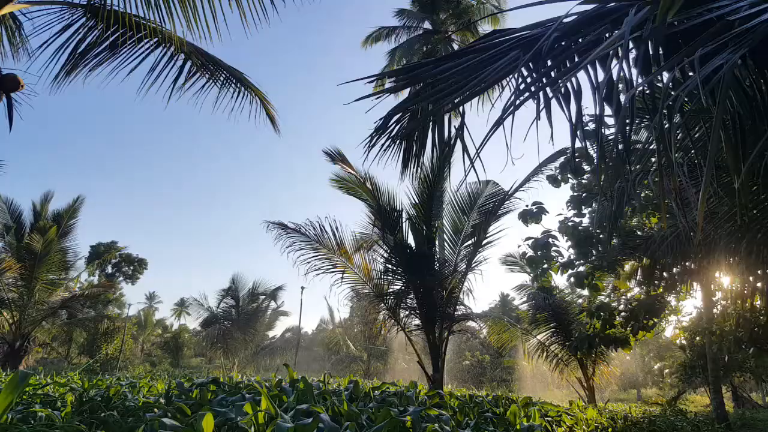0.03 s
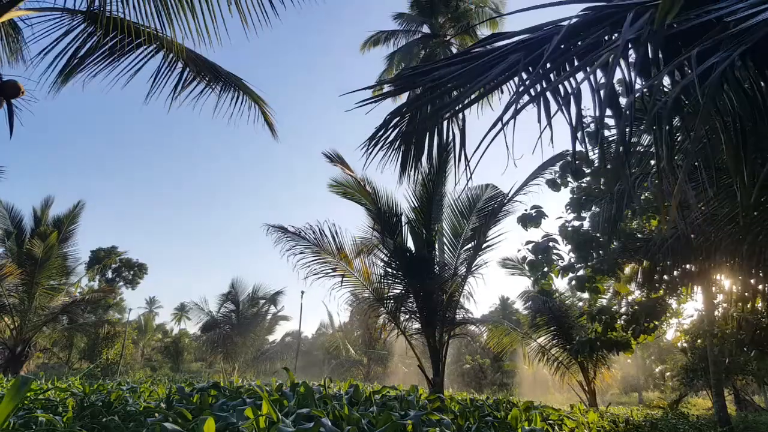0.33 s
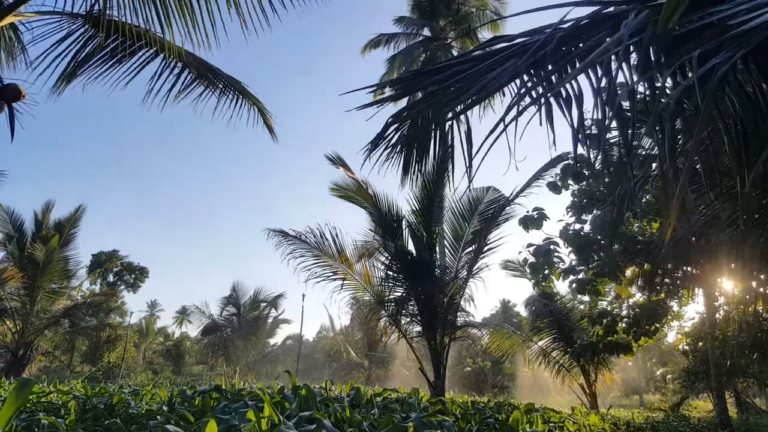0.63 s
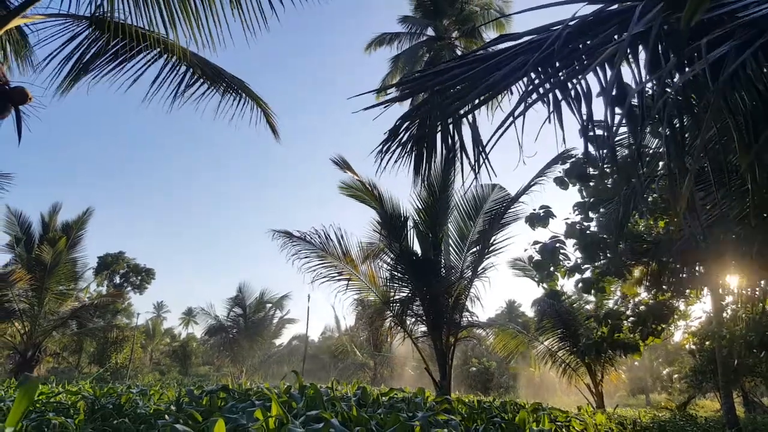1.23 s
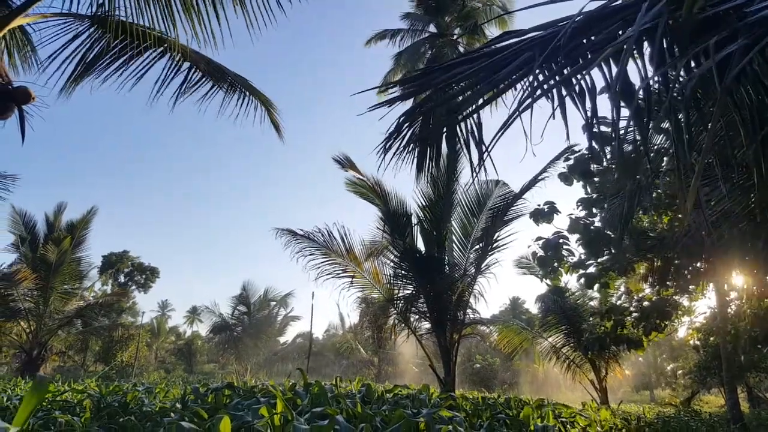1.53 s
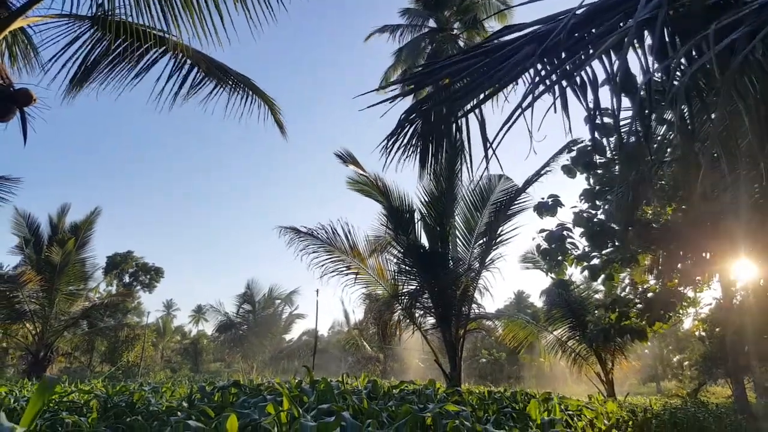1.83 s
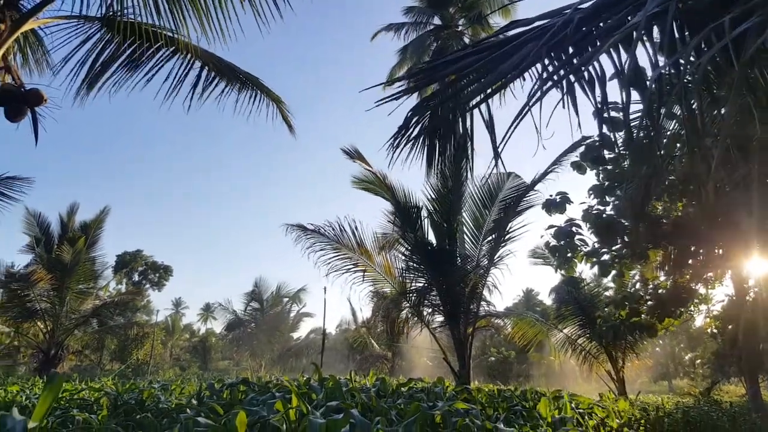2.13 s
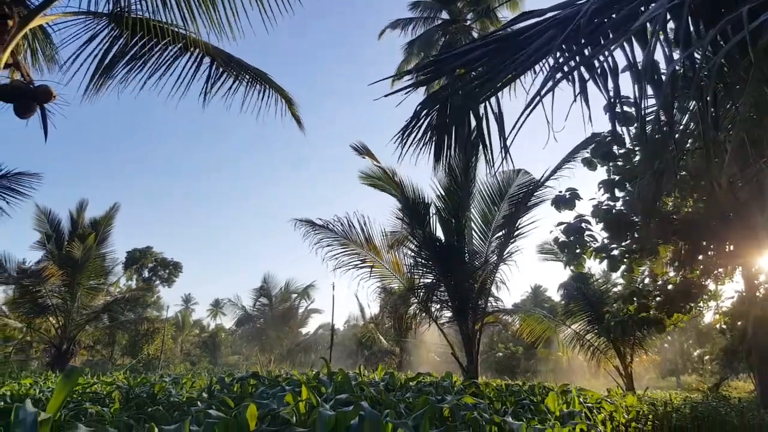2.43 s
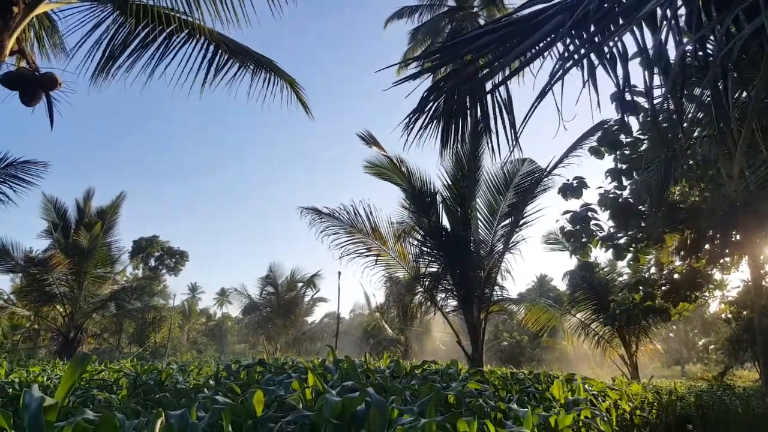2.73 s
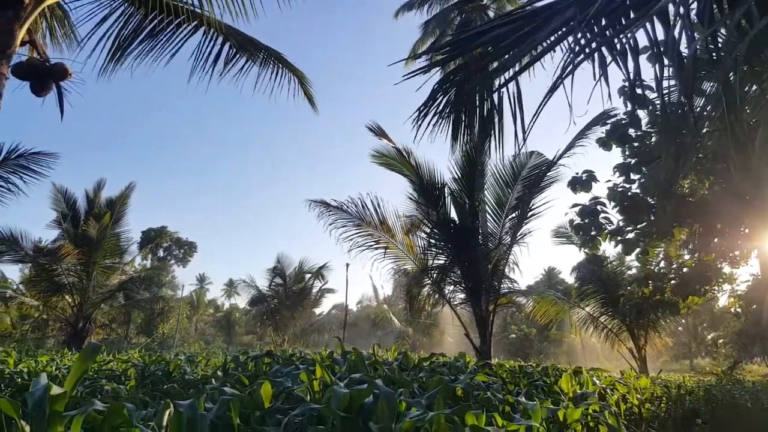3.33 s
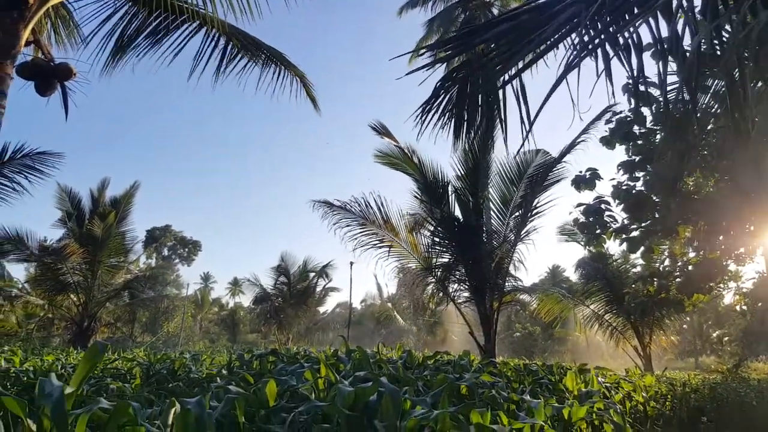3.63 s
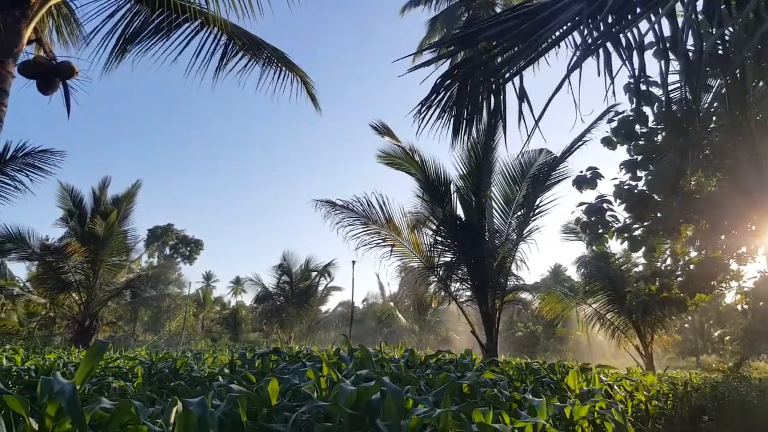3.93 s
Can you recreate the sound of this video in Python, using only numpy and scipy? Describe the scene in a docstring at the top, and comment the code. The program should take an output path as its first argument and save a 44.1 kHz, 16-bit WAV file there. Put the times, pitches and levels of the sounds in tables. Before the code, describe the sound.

Impact sprinklers tick rapidly and spray hissing water over leaves, with a distant pump thudding.

```python
"""Ticking spurts of water: two impact sprinklers, one near and one farther off, in a field among palms.
Each swing of an arm chops the jet into a spurt and clacks on its stop. A little to the left, spray
hisses and patters on the leaves. In the distance a one-cylinder pump engine thuds about eleven times
a second. Two soft gusts reach the microphone, and one drop taps close by."""
import sys
import numpy as np
from scipy import signal
from scipy.fft import rfft, irfft, next_fast_len
from scipy.io import wavfile
from scipy.ndimage import map_coordinates

SR = 44100
rng = np.random.default_rng(int(sys.argv[2]) if len(sys.argv) > 2 else 0)


def unload_audio(sound):
    """Save the sound as a 16-bit wav file, at the path given as the first command line argument."""
    columns = np.transpose(np.atleast_2d(sound))
    # keep every value between -1 and 1, then stretch to whole-number steps
    steps = np.round(np.clip(columns, -1, 1) * 32767)
    wavfile.write(sys.argv[1], SR, steps.astype(np.int16))


N = 176400
NEAR_LAG_S, FAR_LAG_S = -.000408, -.00002  # negative: the left microphone hears it first

# The near arm cutting the jet. Each row: start in seconds, spurt level in dB.
NEAR_STROKES = [(0.113, -59), (0.246, -64), (.370, -60), (.497, -45.5), (0.626, -46), (0.755, -48),
                (0.881, -45.5), (1.007, -55), (1.136, -48), (1.261, -51), (1.390, -48), (1.515, -43.5),
                (1.645, -45), (1.77, -42.5), (1.9, -44), (2.030, -47), (2.159, -46), (2.286, -51),
                (2.414, -45.5), (2.54, -48.5), (2.668, -41.5), (2.798, -46.5), (2.927, -47), (3.058, -46),
                (3.184, -42), (3.314, -44.5), (3.446, -51), (3.574, -47), (3.702, -49), (3.833, -48),
                (3.962, -50)]
# The far head turning toward the microphone. Each row: time in seconds, clack level in dB.
FAR_TURN_LEVELS = [(.1, -57), (1.8, -49), (2.0, -38), (2.37, -37.5), (2.9, -39), (3.5, -36), (4, -37.5)]
# The ring of each arm. Each row: pitch in Hz, relative level in dB, seconds to fade by 60 dB.
NEAR_ARM_MODES = [(2930, -6.5, 0.058), (3160, -12, 0.06), (3950, 2, 0.039), (7900, -11, 0.043)]
FAR_ARM_MODES = [(3076, -4.5, 0.025), (3247, -3.5, 0.022), (3530, -1, 0.0071), (7550, -10, 0.022)]
# Tone colours at the microphone. Each row: frequency in Hz, relative spectral density in dB.
SPURT_SPECTRUM = [(300, -40), (1500, -6), (2700, 4), (3200, 8), (3600, 0), (4000, 5), (4400, -3), (5000, 0),
                  (6200, -4.5), (7800, 4), (8900, 4), (10300, -14), (12000, -13), (15500, -7.5)]
SPLASH_SPECTRUM = [(300, -33), (1500, -14), (3000, 2.5), (4500, 1), (6200, -1), (7900, -1.5),
                   (10200, -13.5), (12000, -6.5), (15500, -11)]
HISS_SPECTRUM = [(200, -39), (1200, -6), (3000, 2.5), (4500, -2), (6200, -3), (7600, 0), (8500, 0.5),
                 (9900, -12.5), (10700, -10), (12000, -9.5), (13300, -12), (14600, -10.5), (16000, -18)]
PATTER_SPECTRUM = [(100, -23.5), (300, -7.5), (480, -0.5), (630, -5), (830, 3.5), (1100, -0.5),
                   (1400, -0.5), (1800, 0.5), (2600, -12), (4000, -12), (9000, -38)]
DRUMMING_SPECTRUM = [(1200, 5), (1800, 3.5), (2250, 10.5), (2600, 2.5), (3300, -61), (6000, -31)]
DROP_SPECTRUM = [(150, -30), (250, -20), (340, 0.5), (600, -6), (1300, -12.5), (2000, -17), (3500, -29),
                 (8000, -49)]
WIND_SPECTRUM = [(15, -14), (35, -3), (65, 2.5), (110, -3), (200, -13), (400, -28.5), (1500, -54)]
LAND_SPECTRUM = [(40, -12), (150, 1), (330, -5.5), (600, -3.5), (1200, -13.5), (4000, -58)]
# How spray, pump and wind rise and fall. Each row: time in seconds, level in dB.
HISS_LEVELS = [(.1, -50), (.55, -49), (.75, -48), (1.05, -48), (1.6, -48.5), (2.5, -50.5), (3.3, -50),
               (4, -50)]
PATTER_LEVELS = [(.1, -55), (.44, -52), (.6, -55), (1.3, -54.5), (2.1, -53), (2.9, -52.5), (3.3, -51),
                 (3.68, -48.5), (4, -50.5)]
DRUMMING_LEVELS = [(.1, -59.5), (.45, -54), (.7, -58), (1.0, -56), (1.25, -58.5), (1.8, -60.5), (2.4, -65),
                   (4, -59)]
PUMP_LEVELS = [(.1, -54), (.33, -45.5), (.42, -53.5), (.52, -46.5), (1.55, -44.5), (1.61, -50), (1.76, -52),
               (1.82, -44.5), (3.0, -45), (4, -42.5)]
WIND_LEVELS = [(.1, -56.5), (.72, -60), (.88, -52), (1.05, -50.5), (1.14, -58.5), (1.7, -64), (1.88, -55),
               (2.01, -50), (2.2, -50), (2.4, -59.5), (4, -65)]
# One engine cycle. Each row: seconds after the exhaust beat, pitch in Hz, half length in seconds,
# relative level in dB.
ENGINE_THUDS = [(-.0105, 193, 0.0033, -3.5), (0, 88.3, 0.0062, 2), (.025, 146.5, .011, -2.5),
                (.0455, 133, 0.0062, -4)]
# The pipe's drone. Each entry: a multiple of the firing rate; in the second list, its level in dB.
PIPE_ORDERS = [6, 14, 16, 18]
PIPE_LEVELS = [-61.5, -67.5, -67.5, -69.5]


def near_sprinkler(splash_db=-50.5, clack_db=-44.5, clack_delay_s=.008):
    """Close by, each stroke is a sharp spurt, a softer splash as it breaks up, and the arm's clack."""
    spurt = water_noise(SPURT_SPECTRUM, per_s=4000, grain_db=-5, direct=0.68)
    spurt *= bursts(NEAR_STROKES, attack_s=0.0027, t60_s=0.078)
    splash = water_noise(SPLASH_SPECTRUM, per_s=3000, grain_db=4, direct=0.14)
    splash *= bursts([(s, splash_db) for s, _ in NEAR_STROKES], attack_s=0.0067, t60_s=0.12)
    landings = [(s + clack_delay_s, clack_db) for s, _ in NEAR_STROKES]
    arm = arm_clacks(landings, NEAR_ARM_MODES, scatter_db=3.5)
    return spurt + splash + placed(arm, NEAR_LAG_S) + foliage(arm, wet_db=-14, t60_s=0.073)


def far_sprinkler(first_s=.0465, period_s=.1288, splash_db=-15):
    """Farther off, a second head ticks between the beats of the first and grows clearer as it turns."""
    times = np.arange(first_s, N / SR, period_s)
    strokes = list(zip(times, np.interp(times, *np.transpose(FAR_TURN_LEVELS))))
    arm = arm_clacks(strokes, FAR_ARM_MODES, scatter_db=-1)
    splash = water_noise(SPURT_SPECTRUM, per_s=2000, grain_db=-13, direct=0.8, lag_s=FAR_LAG_S)
    splash *= bursts(strokes, attack_s=0.0035, t60_s=0.27)
    return placed(arm, FAR_LAG_S) + foliage(arm, wet_db=-11, t60_s=0.06) + amp(splash_db) * splash


def arm_clacks(strokes, modes, scatter_db, attack_s=0.00057, detune=0.0071):
    """An arm hits its stop at each (seconds, dB) and rings briefly, a little differently every time."""
    t, arm = np.arange(SR // 10) / SR, np.zeros(N)
    onset = 1 - np.exp(-t / attack_s)
    for s, db in strokes:
        for hz, mode_db, t60_s in modes:
            strength, mistuning = rng.standard_normal(2)
            ring = np.sin(2 * np.pi * hz * (1 + detune * mistuning) * t) * amp(-60 * t / t60_s)
            add(arm, s, amp(db + mode_db + scatter_db * strength) * ring * onset)
    return arm


def spray():
    """The jets hiss; their water patters on the crop and drums on broad leaves as it sweeps by."""
    hiss = water_noise(HISS_SPECTRUM, per_s=4000, grain_db=0, direct=.2)
    hiss *= amp(curve(HISS_LEVELS) + flutter(depth_db=0.89, per_s=25.1))
    patter = water_noise(PATTER_SPECTRUM, per_s=500, grain_db=-4, direct=0.23)
    patter *= amp(curve(PATTER_LEVELS) + flutter(depth_db=1.23, per_s=30.2))
    drumming = water_noise(DRUMMING_SPECTRUM, per_s=700, grain_db=7.5, direct=0.73)
    drumming *= amp(curve(DRUMMING_LEVELS) + flutter(depth_db=0.57, per_s=14))
    return hiss + patter + drumming


def water_noise(spectrum, per_s, grain_db, direct, lag_s=NEAR_LAG_S):
    """Fine mist with per_s drop impacts a second in each stream, at grain_db relative to the mist."""
    mist, sizes = rng.standard_normal((2, 3, N))
    impacts = sizes * (rng.random((3, N)) < per_s / SR)
    return coloured(spread(mist + amp(grain_db) * unit(impacts), direct, lag_s), spectrum)


def close_drop(at_s=1.5895, level_db=-31):
    """One dull drop lands beside the microphone, to the left."""
    impact = np.zeros(N)
    add(impact, at_s, np.ones(1))
    tap = coloured(impact, DROP_SPECTRUM)
    return tap / tap.max() * amp(level_db) * lean_left(db=5)


def pump(first_s=.0431, period_s=.0931, jitter_s=0.00076, scatter_db=1.07, low_cut_hz=52):
    """Each cycle of the distant engine is a low exhaust beat and blurred thuds, over its pipe's drone."""
    half_s = .04
    t, thuds = np.arange(-half_s, half_s, 1 / SR), np.zeros(N)
    for beat_s in np.arange(first_s, N / SR, period_s):
        start_s = beat_s + jitter_s * rng.standard_normal() - half_s
        for delay_s, hz, width_s, db in ENGINE_THUDS:
            thud = np.cos(2 * np.pi * hz * t) * np.exp(-(t / width_s) ** 2)
            add(thuds, start_s + delay_s, amp(db + scatter_db * rng.standard_normal()) * thud)
    thuds = filtered(thuds, lambda hz: 1 - np.exp(-(hz / low_cut_hz) ** 4))
    engine = amp(curve(PUMP_LEVELS)) * (thuds + foliage(thuds, wet_db=-25, t60_s=0.38))
    phase = 2 * np.pi * (np.arange(N) / SR - first_s) / period_s
    drone = sum(amp(db) * np.cos(order * phase) for order, db in zip(PIPE_ORDERS, PIPE_LEVELS))
    return (engine + drone) * lean_left(db=.6)


def wind(murmur_db=-60):
    """Two gusts rumble at the microphone, over the dull, steady murmur of open land."""
    gusts = coloured(spread(rng.standard_normal((3, N)), direct=0.36), WIND_SPECTRUM)
    gusts *= amp(curve(WIND_LEVELS) + flutter(depth_db=0.3, per_s=11))
    murmur = coloured(spread(rng.standard_normal((3, N)), direct=1.0), LAND_SPECTRUM)
    return gusts + amp(murmur_db) * murmur


def foliage(x, wet_db, t60_s):
    """Trees and crops scatter a short tail back to the microphones."""
    t = np.arange(SR // 3) / SR
    tail = rng.standard_normal((2, len(t))) * amp(-60 * t / t60_s)
    tail /= np.linalg.norm(tail[0])
    return amp(wet_db) * signal.fftconvolve(x[None], tail, axes=1)[:, :N]


def spread(streams, direct, lag_s=0):
    """One stream arrives straight on with the direct share of the power; two scatter left and right."""
    return np.sqrt(direct) * placed(streams[0], lag_s) + np.sqrt(1 - direct) * streams[1:]


def placed(x, lag_s):
    """A mono sound that reaches the left microphone lag_s after the right."""
    return filtered(x, lambda hz: np.exp(1j * np.pi * hz * lag_s * np.array([[-1], [1]])))


def lean_left(db):
    """Gains that raise the left side by db and lower the right as much."""
    return amp(db * np.array([[1], [-1]]))


def bursts(strokes, attack_s, t60_s):
    """An envelope that jumps and fades at each (seconds, dB)."""
    t, power = np.arange(SR // 3) / SR, np.zeros(N)
    shape = (1 - np.exp(-t / attack_s)) * amp(-60 * t / t60_s)
    for s, db in strokes:
        add(power, s, (amp(db) * shape / shape.max()) ** 2)
    return np.sqrt(power)


def flutter(depth_db, per_s):
    """A smooth random waver in dB, through per_s points a second."""
    return depth_db * map_coordinates(rng.standard_normal(4000), [np.arange(N) * per_s / SR], mode="wrap")


def curve(rows):
    """(seconds, value) points as one value per sample."""
    return np.interp(np.arange(N) / SR, *np.transpose(rows))


def coloured(x, spectrum):
    """x shaped by a spectrum, at rms 1."""
    points_hz, db = np.transpose(spectrum)
    return unit(filtered(x, lambda hz: amp(np.interp(np.log(hz + 1), np.log(points_hz), db))))


def filtered(x, response):
    """x through a complex frequency response."""
    size = next_fast_len(N + SR // 4)
    return irfft(rfft(x, size) * response(np.fft.rfftfreq(size, 1 / SR)), size)[..., :N]


def add(track, s, sound):
    """Mix a sound in at s seconds."""
    i = int(np.clip(round(s * SR), 0, N))
    track[i:i + len(sound)] += sound[:N - i]


def amp(db):
    """Decibels to gain."""
    return 10 ** (np.asarray(db) / 20)


def unit(x):
    """Scale to rms 1."""
    return x / np.sqrt(np.mean(x ** 2) + 1e-20)


def scene():
    """From the microphone: water a little to the left, over the distant pump and the wind."""
    water = near_sprinkler() + far_sprinkler() + spray()
    return water * lean_left(db=1) + pump() + wind() + close_drop()


def record(dry):
    """The microphones open after a moment of silence and pass nothing above top_hz."""
    start_s, top_hz = .105, 15850
    return filtered(dry * (np.arange(N) / SR > start_s), lambda hz: hz < top_hz)


dry = scene()
out = record(dry)
unload_audio(out)
```